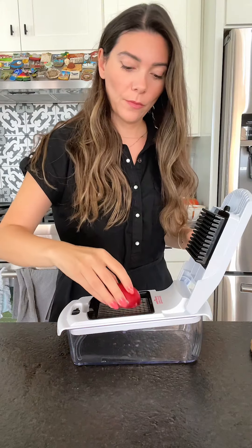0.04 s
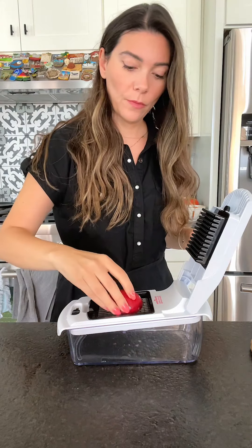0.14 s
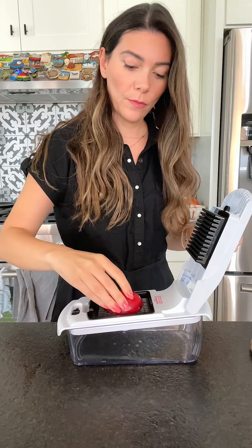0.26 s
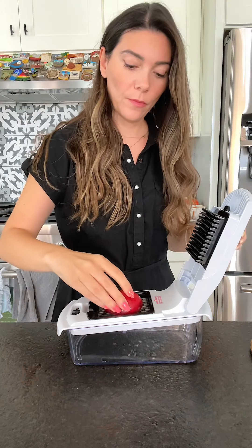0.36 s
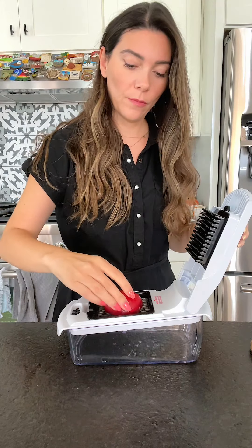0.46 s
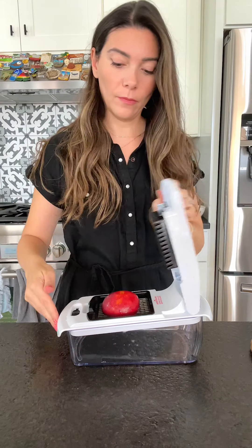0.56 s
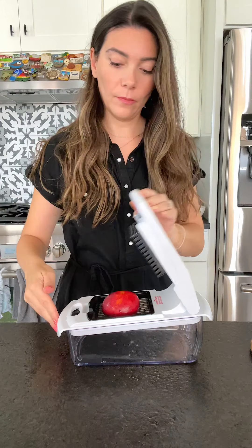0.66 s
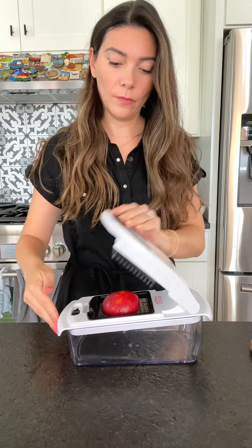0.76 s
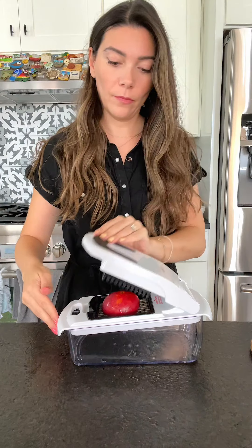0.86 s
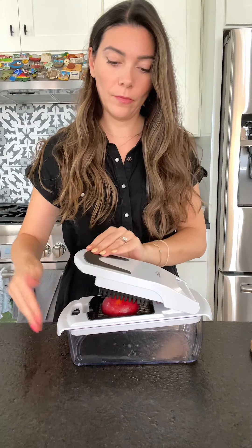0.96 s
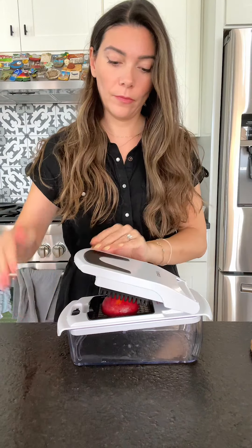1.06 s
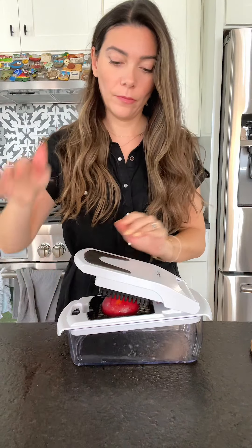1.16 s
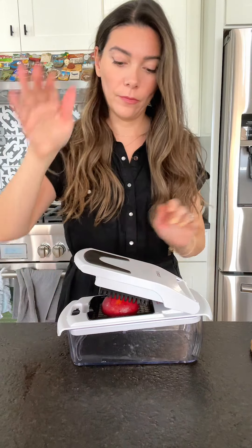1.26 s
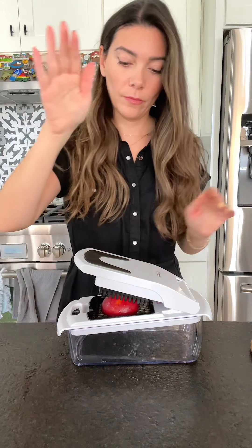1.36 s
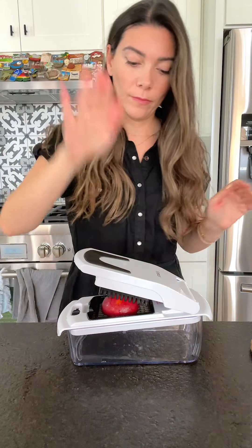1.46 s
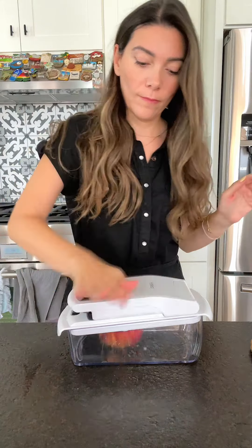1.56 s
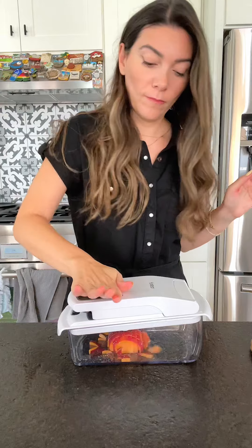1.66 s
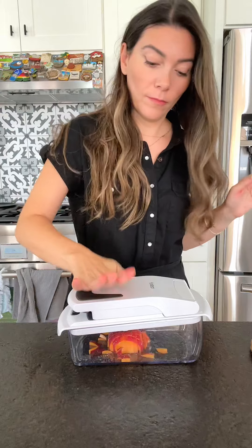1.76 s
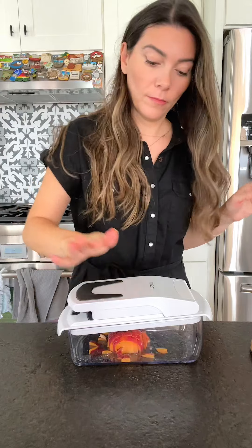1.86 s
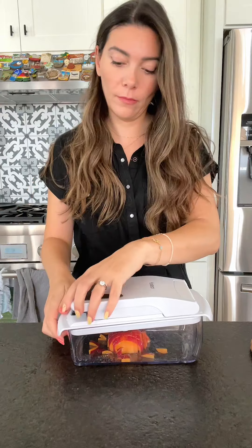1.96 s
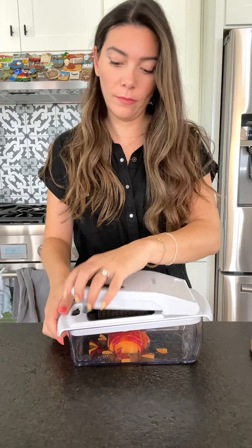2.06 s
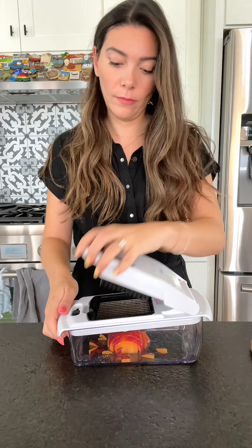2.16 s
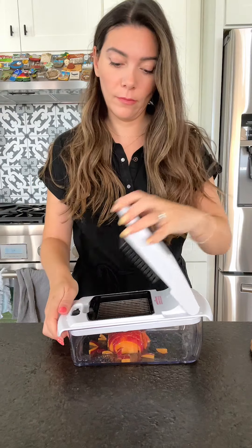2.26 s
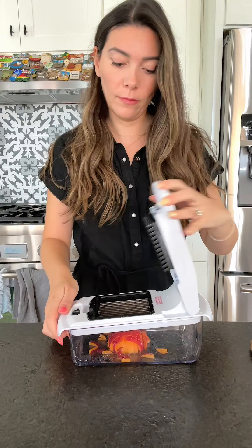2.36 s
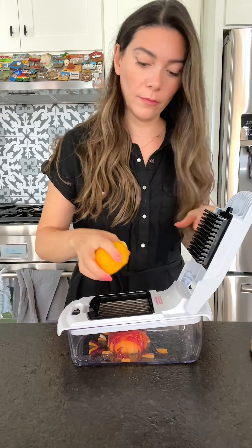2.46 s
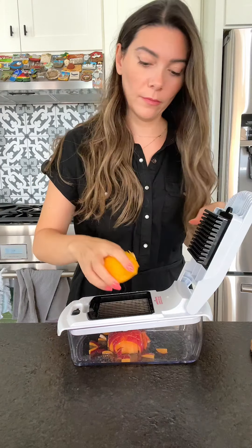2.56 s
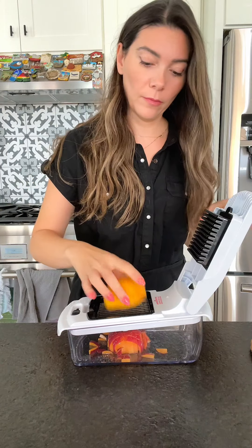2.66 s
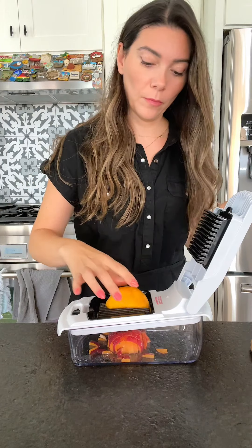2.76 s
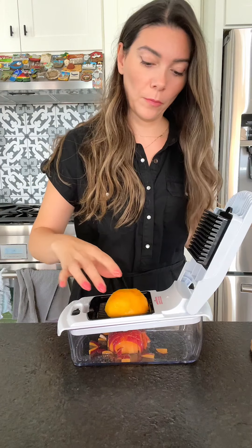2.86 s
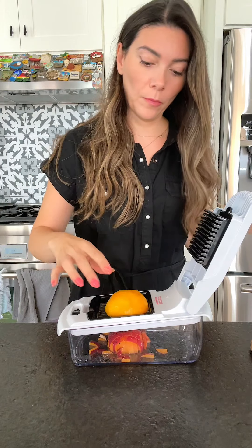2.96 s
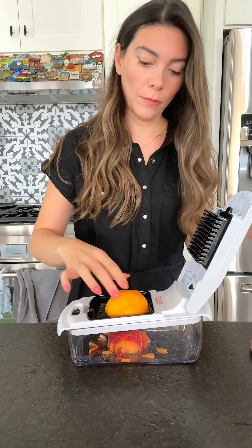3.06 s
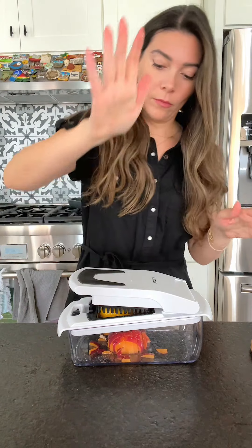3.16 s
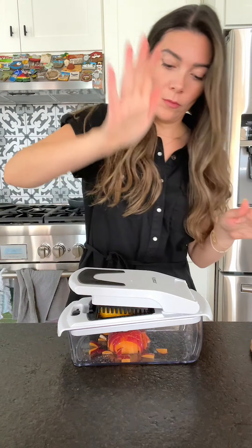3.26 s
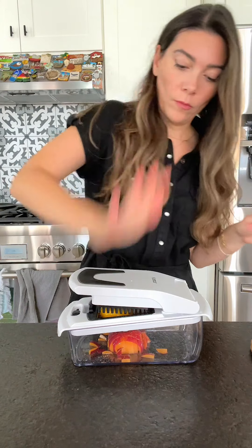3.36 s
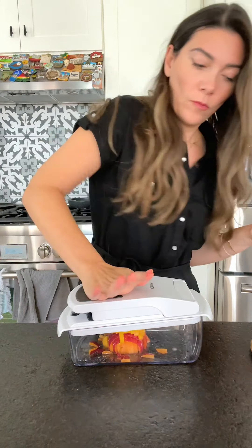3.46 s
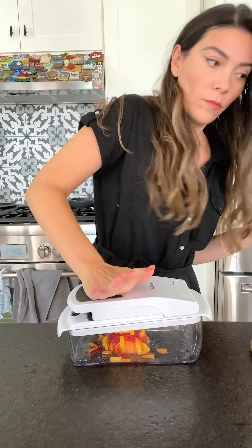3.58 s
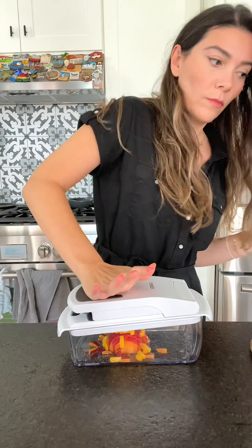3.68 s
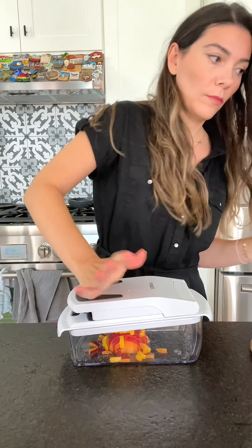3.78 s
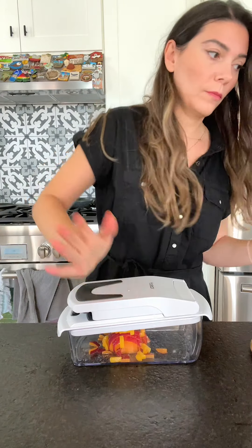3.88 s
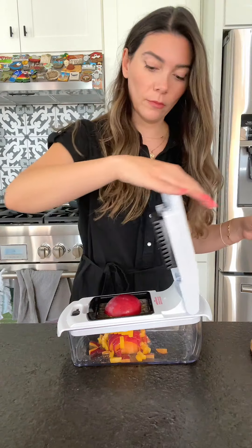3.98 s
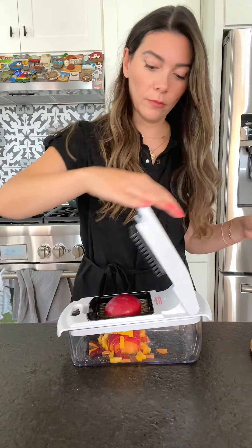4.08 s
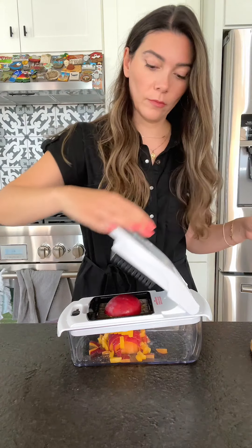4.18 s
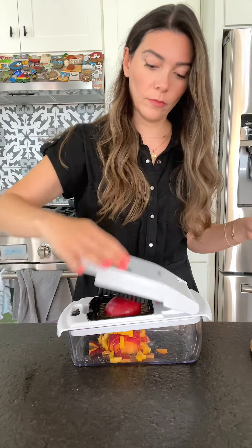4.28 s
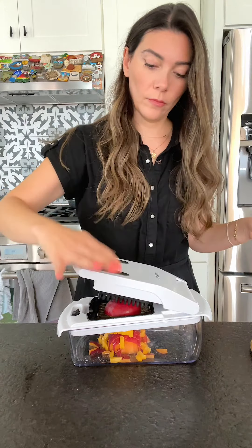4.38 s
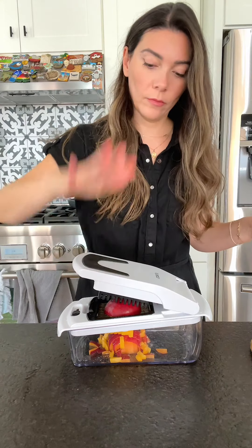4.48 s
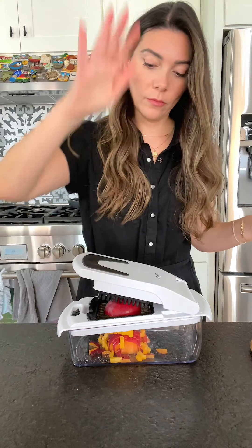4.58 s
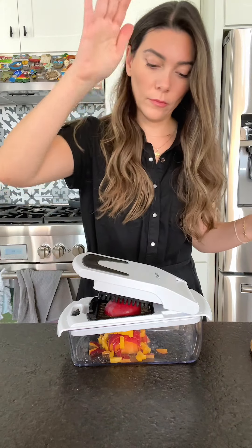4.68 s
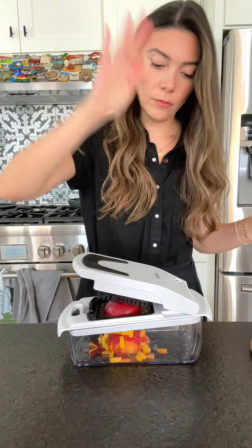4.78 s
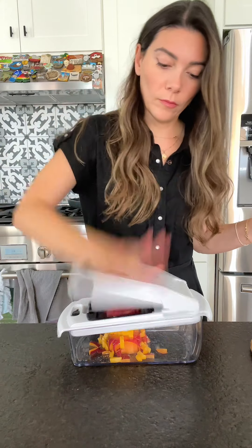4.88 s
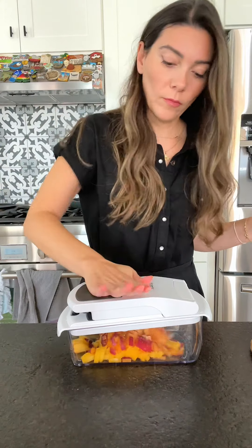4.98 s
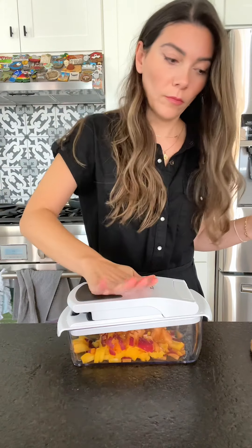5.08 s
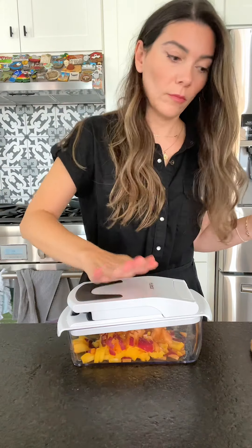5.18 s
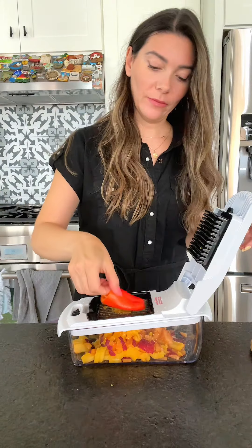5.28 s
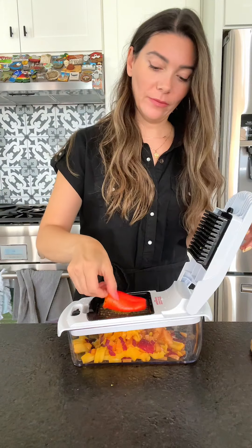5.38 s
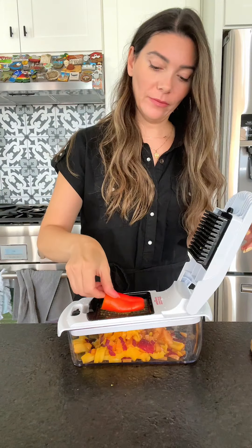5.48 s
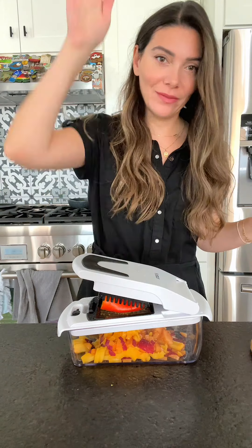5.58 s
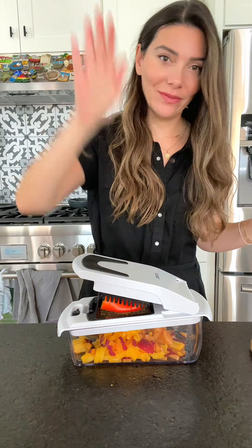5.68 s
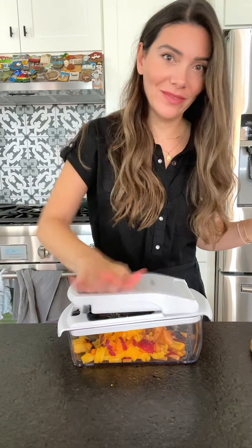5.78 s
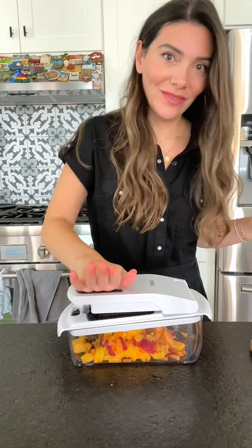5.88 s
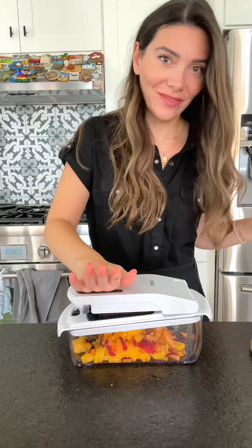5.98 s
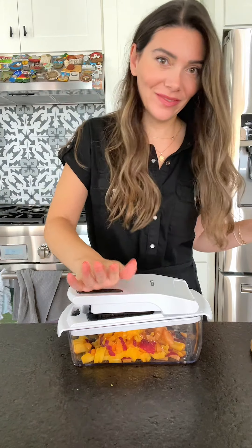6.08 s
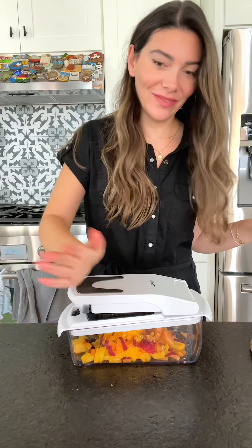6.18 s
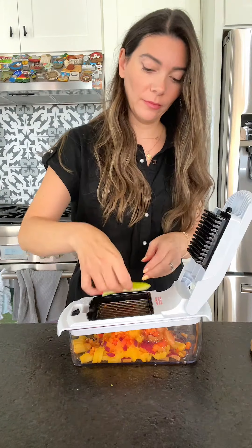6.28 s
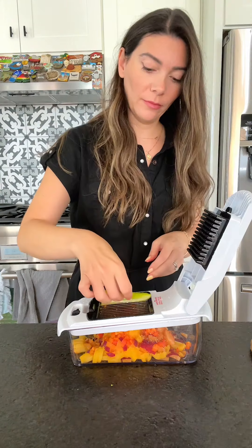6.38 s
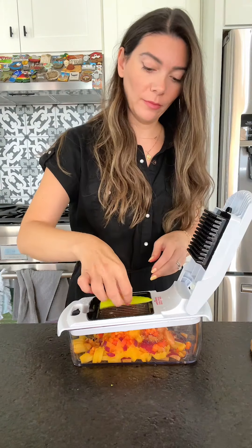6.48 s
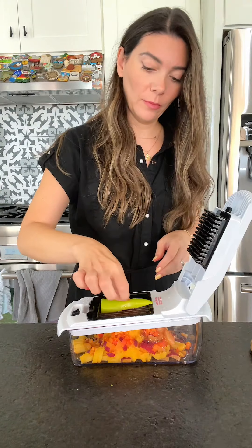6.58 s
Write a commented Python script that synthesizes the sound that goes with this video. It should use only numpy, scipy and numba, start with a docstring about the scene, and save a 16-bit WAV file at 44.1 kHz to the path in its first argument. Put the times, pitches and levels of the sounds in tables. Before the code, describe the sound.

Close stereo pickup of a manual fruit chopper on a hard counter. Soft handling and small plastic taps lead to an explosive lid slam, repeated three more times with lighter knocks between. Each slam is a fast crunching clatter, hollow and bright, with low thump, metallic shimmer and falling pieces. Echo swells up behind it, then is chopped off at edits, over low hum, faint hiss and changing rumble.

```python
"""In a hard kitchen, hands first rub and knock the plastic of a vegetable chopper, over hum, hiss and rumble.
Then, four times, a palm slams its hinged lid onto fruit: a quick run of blows rings lid and tub as damped modes.
Slams and some knocks also excite counter and blade grid; after slams the cut fruit patters into the tub.
A limiter ducks each slam, then holds its echo up while it recovers. Between slams, knocks and rubs return.
Where a new stretch begins, the echo stops short and the background levels step."""
import sys
import numpy as np
from scipy import signal
from scipy.fft import rfft, irfft, next_fast_len
from scipy.io import wavfile
from scipy.ndimage import uniform_filter1d
from numba import njit

SR = 44100
rng = np.random.default_rng(int(sys.argv[2]) if len(sys.argv) > 2 else 0)


def output_pcm(signal):
    """Save a mono or channel-first signal as 16-bit PCM at the path in sys.argv[1].

    Samples are clipped to [-1, 1] before scaling.
    """
    pcm = np.clip(np.atleast_2d(signal).T, -1, 1) * 32767
    wavfile.write(sys.argv[1], SR, np.round(pcm).astype(np.int16))


N = 292496

# stretches of steady background: (start t/s, hum level/dB, air hiss level/dB, low rumble level/dB)
STRETCHES = [(0, -61, -73.5, -66.5), (1.912, -60.5, -72, -89), (2.477, -62.5, -77, -72),
             (3.152, -61, -76.5, -78), (3.946, -61, -72.5, -50.5), (5.245, -64.5, -76, -69.5),
             (6.279, -59, -77, -96)]
# power spectra of the background, each scaled to rms 1: (f/Hz, relative density level/dB)
HUM_SPECTRUM = [(15, -39), (25, -18), (44, -1), (91, -9), (151, -6), (237, -8), (267, 1), (297, -14),
                (452, -1), (517, -13.5), (763, -8.5), (900, -25), (1170, -46.5), (1980, -120)]
HISS_SPECTRUM = [(530, -31.5), (900, -4), (944, -6), (1040, -4), (1350, -5), (2250, -10), (16000, -37)]
RUMBLE_SPECTRUM = [(15, -43), (25, -13), (44, -1.5), (91, -3), (117, -8.5), (150, 0), (185, -17), (238, -3),
                   (283, -7), (337, -7), (386, -18), (459, -12.5), (649, -17), (1770, -33), (2500, -44.5),
                   (3250, -72.5), (5500, -120)]
# wavering tones in the rumble: (mean f/Hz, level/dB relative to the rms of the rumble noise)
DRONE = [(58, -11.5), (88, -7.5), (150, -8.5), (240, -7.5), (335, -11.5)]

# fingers and fruit rubbing on the plastic: (start t/s, length t/s, level/dB, hiss level/dB relative to the ring)
RUBS = [(0.088, 0.044, -53, -20), (0.136, 0.031, -52, -12), (0.498, 0.26, -66.5, -11),
        (0.89, 0.027, -66, -22), (0.949, .02, -55.5, -22), (1.97, 0.052, -58, -24),
        (2.044, 0.09, -65.5, -0.5), (2.128, 0.032, -56.5, -13), (2.21, 0.098, -68, -22),
        (2.36, 0.056, -70, -36), (3.541, 0.12, -39.5, -34.5), (3.704, 0.047, -41.5, -32),
        (4.345, .035, -45, -16), (4.403, .1, -57, -7), (5.30, 0.08, -74, -8), (6.389, 0.068, -76.5, -14),
        (6.477, 0.047, -70, -5)]
RUB_ATTACK_S, RUB_RELEASE_T60_S = 0.012, 0.05
# lid, hinge and fingers knocking the plastic:
# (t/s, strength level/dB, contact half-width t/ms, crack level/dB relative to the ring)
KNOCKS = [(0.099, -40, 0.61, -13), (0.961, -35.5, 0.78, -20.5), (0.972, -33.5, 1.2, -37),
          (0.985, -46.5, 0.44, -28), (1.975, -42.5, 0.91, -15), (2.025, -53, 0.7, -27),
          (2.042, -31, 0.3, -25), (2.049, -37, 2.1, -24), (2.118, -42, 0.98, -21),
          (2.155, -37.5, 0.63, -20), (2.198, -34, 0.54, -26.5), (2.213, -42, 0.42, -23),
          (2.334, -24.5, 0.44, -41), (2.708, -5.5, 0.33, -8), (2.714, -13, 0.89, -30),
          (2.720, -7, 0.34, -24), (2.852, -18.5, 0.28, -12), (2.857, -19, 0.56, -28),
          (3.611, -17, 0.44, -32), (3.630, -44, .3, -23), (3.707, -25, 0.84, -26.5),
          (3.748, -33, 0.45, -30), (4.302, -21.5, 0.35, -17.5), (4.304, -16.5, 0.73, -26),
          (4.318, -27, 0.2, -19), (4.323, -23.5, 0.65, -17.5), (5.284, -42, .5, -11),
          (5.288, -27, 0.88, -27.5), (5.297, -35, 0.84, -12.5), (6.385, -44.5, 0.72, -17.5),
          (6.521, -42, 0.99, -25.5), (6.573, -49.5, 1.1, -31.5)]
KNOCK_ECHO_DB = 3  # extra echo level of the knocks, relative to that of the slams
KNOCK_HELD = 0.65  # factor on the free decay times while a hand rests on the plastic
# small bright ticks, nails or ring touching the frame: (t/s, strength level/dB)
TICKS = [(0.099, -62), (0.152, -66), (0.511, -70), (0.905, -74), (0.962, -60), (1.974, -70), (2.083, -61.5),
         (4.322, -27), (5.288, -48), (6.380, -63.5), (6.445, -66.5), (6.502, -66), (6.514, -73),
         (6.57, -71.5)]
# modes of a tick, before each lands at its own spot: (mean f/Hz, mean level/dB, t60/s)
TICK_MODES = [(2700, -9, .003), (3750, -4, .004), (4900, -1, .003), (6000, 0., .003), (7200, 0., .003),
              (8600, -3, .002), (10200, -7, .002)]

# palm, blades and lid landing:
# (t/s, strength level/dB, contact half-width t/ms, crack level/dB relative to the ring)
SLAMS = [(1.554, 10, 0.25, -4), (1.560, 13.5, 0.71, -20), (1.568, 8.5, 0.28, 3.5), (1.581, 23, 0.18, -9),
         (3.393, 5.5, 0.47, -9.5), (3.398, 6, 1.2, -14.5), (3.411, 13.5, 0.072, -13),
         (3.42, 7.5, 1.16, -18), (4.881, 8, 0.25, -4), (4.887, 17, 0.32, -11), (4.895, 17, 0.6, -21),
         (4.902, 21.5, 0.12, -5.5), (5.769, 2, 0.19, -2), (5.777, 11.5, 0.42, -15), (5.785, 12, 0.077, -11),
         (5.789, 8.5, 0.99, -19)]
# modes of lid and tub: (f/Hz, mean level/dB, free t60/s)
BODY = [(220, -21.5, 0.13), (260, -18.5, 0.11), (320.3, -6, 0.1), (390, 3.5, 0.04), (525, 3, 0.041),
        (644, -0.5, 0.028), (790.3, 3, .045), (935.4, -1.5, 0.048), (1094, -2.5, 0.032),
        (1118, -5.5, 0.057), (1297, 1, 0.032), (1404, 0.5, 0.017), (1360, -5.5, 0.01), (1677, -8, 0.04),
        (2340, -7.5, 0.02), (2310, -11, 0.041), (2390, -6.5, 0.0075), (2947, -19.5, 0.0043),
        (3240, -23.5, 0.0087), (3380, -15.5, 0.06), (4160, -17.5, 0.0037)]
# spectrum of the plastic's crack, also of its rubbing hiss: (f/Hz, relative level/dB)
CRACK_SPECTRUM = [(300, -20), (1200, 8.5), (2400, -1), (4500, -6), (7000, -12.5), (11000, -18.5),
                  (16000, -34.5)]
CRACK_T60_S = 0.026
SMALL_BODY_HZ = 119  # below this the small body radiates little

# kitchen echo: (f/Hz, relative level/dB, late t60/s, left-right correlation 0-1, added late level/dB)
KITCHEN = [(64.77, -4.5, 0.27, 1, -0.5), (125, -1.5, 0.59, 1, -5), (247, -7, 0.57, 0.9, 0),
           (514, -6.5, 0.63, 0.4, 1), (740, -3, .75, 0, 2.5), (1050, -2, 0.75, 0, -1),
           (1552.4, -2.5, .66, 0.19, 2.5), (2120, 4.5, .66, 0.2, 1.5), (2700, 5, 0.59, 0, 6),
           (3400, 1, .66, .2, 5.5), (4100, 2, 0.67, 0.1, 0), (6640, -3, 0.6, 1, 2.5),
           (9200, -0.5, .5, 0, 1.5), (14300, -3, .25, 0, -4.5)]
LATE_DB, EARLY_DB, EARLY_T60_S = -14.5, -3.5, 0.16
ECHO_PATHS = 3  # independent noise echoes that successive blows take in turn, for a diffuse tail

PIECES_DB, PIECES_T60_S = -35.5, 0.25  # level relative to the driving blow, and decay of the patter
# the counter thumped by slams and the falling lid: (t/s, strength level/dB)
THUMPS = [(1.56, -17), (2.71, -41), (3.40, -17), (4.89, -16), (5.775, -25.5)]
# modes of the counter: (f/Hz, level/dB, t60/s)
COUNTER = [(62.3, 0.5, 0.42), (124.3, -3.5, 0.51), (243, -4, 0.5)]
# the steel blade grid set ringing: (t/s, strength level/dB)
BLADE_TAPS = [(1.582, -19), (2.71, -41), (3.412, -15.5), (4.322, -50.5), (4.903, -17), (5.292, -53),
              (5.785, -17)]
# modes of the blades, before chatter blurs them: (f/Hz, level/dB, t60/s)
BLADES = [(2110, -2, 0.11), (2209, 0, 0.3), (2406, 0, 0.13), (2420, -8, 0.33), (2580, -11.5, 0.16)]

LIMIT_DB, ATTACK_S, RECOVER_DB_S = -6.5, 0.0091, 72  # threshold, attack time constant, recovery rate
KNEE = 12  # exponent of the soft saturation
LOW_CUT_HZ, TOP_HZ = 45, 16100


def undb(db):
    """Level definition: amplitude ratio from decibels."""
    return 10 ** (np.asarray(db) / 20)


def fade(t, t60):
    """Exponential decay, falling 60 dB in t60."""
    return np.exp(-np.log(1000) * t / t60)


def along(hz, table, column=1):
    """Linear interpolation of a table column on a log-frequency axis."""
    table = np.array(table)
    return np.interp(np.log(np.maximum(hz, 1)), np.log(table[:, 0]), table[:, column])


def edges():
    """Division of time: sample indices at which stretches begin, and the end."""
    return [int(row[0] * SR) for row in STRETCHES] + [N]


def high_pass(sound, hz):
    """Second-order high-pass filtering."""
    return signal.sosfilt(signal.butter(2, hz, "high", fs=SR, output="sos"), sound)


def coloured(table, size):
    """Spectral shaping: stereo noise of rms 1, its left-right correlation that of the kitchen."""
    fast = next_fast_len(size)
    hz = np.fft.rfftfreq(fast, 1 / SR)
    alike = np.clip(along(hz, KITCHEN, column=3), 0, 1)
    white = rfft(rng.standard_normal((2, fast)))
    mid, side = white * undb(along(hz, table)) * np.sqrt([1 + alike, 1 - alike])
    pair = irfft(np.array([mid + side, mid - side]), fast)[:, :size]
    return pair / np.sqrt(np.mean(pair ** 2))


def rumbling(waver=0.039):
    """Frequency modulation: broad low noise holds a few tones whose pitch wanders slowly."""
    wander = rng.standard_normal((len(DRONE), N))
    drift = uniform_filter1d(wander, size=SR // 8, axis=1) * np.sqrt(SR / 8)
    hz, db = np.transpose(DRONE)[:, :, None]
    phase = 2 * np.pi * np.cumsum(hz * (1 + waver * drift), axis=1) / SR
    tones = undb(db) * np.sqrt(2) * np.sin(phase)
    return coloured(RUMBLE_SPECTRUM, size=N) + tones.sum(axis=0)


def ring(shares_db, signs, held, rise_cycles=0.41):
    """Modal superposition: a sharp tap excites modes weighted by its place; low modes build up later."""
    hz, db, t60 = np.transpose(BODY)[:, :, None]
    t = np.arange(4096) / SR
    rise = 1 - np.exp(-t * hz / rise_cycles)
    swing = fade(t, held * t60) * rise * np.sin(2 * np.pi * hz * t)
    return np.sum(signs[:, None] * undb(db + shares_db[:, None]) * swing, axis=0)


def contact_push(contact_ms):
    """Contact force: a raised-cosine pulse whose width at half height is about the contact time."""
    return np.hanning(max(int(2 * contact_ms * SR / 1000), 1) + 2)


def slipping(slips_hz, scatter_db, contact_ms, held, spot_db=4.0, count=6):
    """Stick-slip: random soft taps at changing spots give a damped ring, and a hiss in the same bursts."""
    happens = rng.random(N) < slips_hz / SR  # slips_hz is the mean rate
    strength = undb(scatter_db * np.minimum(rng.exponential(size=N), 2)) * rng.standard_normal(N)
    slips = happens * strength
    spot = np.repeat(rng.integers(0, count, N // 512 + 1), 512)[:N]
    push, body = contact_push(contact_ms), 0
    for k, (share, sign) in enumerate(rng.standard_normal((count, 2, len(BODY)))):
        tap = np.convolve(ring(spot_db * share, np.sign(sign), held), push)
        body = body + signal.oaconvolve(slips * (spot == k), tap)[:N]
    hiss = coloured(CRACK_SPECTRUM, size=N) * uniform_filter1d(np.abs(slips), size=600)
    return body / body.std(), hiss / hiss.std()


def rubbing():
    """Friction: skin and fruit drag on plastic the hand damps; each rub swells, holds and dies away."""
    body, hiss = slipping(slips_hz=1490.0, scatter_db=0.0, contact_ms=0.076, held=0.68)
    t, out = np.arange(N) / SR, 0
    for s, length, db, hiss_db in RUBS:
        swell = np.clip((t - s) / RUB_ATTACK_S, 0, 1)
        level = swell * fade(np.maximum(t - s - length, 0), RUB_RELEASE_T60_S)
        out = out + undb(db) * level * (body + undb(hiss_db) * hiss)
    return out


def side_db(low_db=-19, high_db=-5):
    """Directivity: the left-right difference is small for low modes, larger for high ones."""
    return along(np.array(BODY)[:, 0], [(400, low_db), (2000, high_db)])


def all_round(sound, octaves=0.32):
    """Radiated power: walls get every face at once, a short pulse with the sound's smoothed spectrum."""
    total = np.cumsum(np.abs(rfft(sound)) ** 2)
    bins = np.arange(len(total))
    low = bins * 2 ** -octaves - 1
    high = np.minimum(bins * 2 ** octaves + 1, bins[-1])
    power = (np.interp(high, bins, total) - np.interp(low, bins, total)) / (high - low)
    return np.roll(irfft(np.sqrt(power)), 256)[:512] * np.hanning(512)


def blows(table, echo_db=0., held=0.81, spot_db=2.5, spread_s=0.002):
    """Impact excitation: each contact pulse rings the body and cracks.

    Rows: left, right, then what each echo path receives."""
    out, t = np.zeros((2 + ECHO_PATHS, N + 8192)), np.arange(4096) / SR
    for k, (s, db, contact_ms, crack_db) in enumerate(table):
        spot = rng.standard_normal((3, len(BODY)))
        push, shares_db = contact_push(contact_ms), spot_db * spot[0]
        mid = signal.fftconvolve(ring(shares_db, np.sign(spot[1]), held), push)[:4096]
        side = signal.fftconvolve(ring(shares_db + side_db(), np.sign(spot[2]), held), push)[:4096]
        body = (mid + side * np.array([[1], [-1]])) / np.abs(mid).max()
        crack = coloured(CRACK_SPECTRUM, size=4096)
        crack = crack + 0.84 * crack.mean(axis=0)  # more alike left and right
        crack = crack * fade(t, CRACK_T60_S) * (1 - np.exp(-t / spread_s))
        at, sound = int(s * SR), undb(db) * (body + undb(crack_db) * crack)
        out[:2, at:at + 4096] += sound
        out[2 + k % ECHO_PATHS, at:at + 512] += undb(echo_db) * all_round(sound[0])
    return out[:, :N]


def ticking(spot_db=3.0, detune=0.06, scrape_s=0.006):
    """Noise-excited modes: each tick is a tiny scrape into short high modes, varied by where it lands."""
    out, t = np.zeros(N + 2048), np.arange(1024) / SR
    hz, db, t60 = np.transpose(TICK_MODES)[:, :, None]
    for s, strength_db in TICKS:
        spot = rng.standard_normal((2, len(TICK_MODES), 1))
        scrape = rng.standard_normal(1024) * fade(t, scrape_s)
        scrape = scrape / np.sqrt(np.sum(scrape ** 2))
        amplitude = undb(strength_db + db + spot_db * spot[0])
        swing = amplitude * fade(t, t60) * np.sin(2 * np.pi * hz * (1 + detune * spot[1]) * t)
        at = int(s * SR)
        out[at:at + 2047] += np.convolve(swing.sum(axis=0), scrape)
    return out[:N]


def kitchen():
    """Reverberation: near cupboards' echo dies fast, the whole room's slowly and by frequency band."""
    size, table = SR, np.array(KITCHEN)
    t = np.arange(size) / SR
    octave = np.log2(np.maximum(np.fft.rfftfreq(size, 1 / SR), 1))
    centres = np.log2(table[:, 0])
    noise, echo = rfft(coloured(table[:, :2], size=size)), 0
    for k, (_, _, late_t60, _, late_colour_db) in enumerate(KITCHEN):
        band = irfft(noise * np.interp(octave, centres, np.arange(len(KITCHEN)) == k), size)
        late = undb(LATE_DB + late_colour_db) * fade(t, late_t60)
        early = undb(EARLY_DB) * fade(t, EARLY_T60_S)
        echo = echo + band * (late + early)
    onset = np.clip(t / 0.00093, 0, 1)
    return echo * onset / np.sqrt(0.038 * SR)


def pieces(hiss_db=-10, light_hz=800):
    """Many small impacts: cut fruit patters ever softer into the tub, too light to stir the low modes."""
    body, hiss = slipping(slips_hz=396.0, scatter_db=5.0, contact_ms=0.09, held=0.48)
    body = high_pass(body, light_hz)
    level, starts = np.zeros(N), np.array(edges())
    for s, db, *_ in SLAMS:
        a = int(s * SR)
        b = starts[starts > a][0]  # the patter stops with its stretch
        level[a:b] += undb(db + PIECES_DB) * fade(np.arange(b - a) / SR, PIECES_T60_S)
    return level * (body + undb(hiss_db) * hiss)


def taps(table):
    """Impulsive excitation: one impulse per blow."""
    out = np.zeros(N)
    for s, db in table:
        out[int(s * SR)] = undb(db)
    return out


def modes(table):
    """Impulse response: a sum of decaying sinusoids."""
    t = np.arange(SR) / SR
    return sum(undb(db) * fade(t, t60) * np.sin(2 * np.pi * hz * t) for hz, db, t60 in table)


def blade_grid(chatter_s=0.12):
    """Repeated contact: blades chatter in their frame after a tap, which blurs their modal ring."""
    t = np.arange(SR // 4) / SR
    chatter = rng.standard_normal(SR // 4) * fade(t, chatter_s)
    return signal.fftconvolve(modes(BLADES), chatter / np.sqrt(np.sum(chatter ** 2)))


def scene():
    """Superposition: background, direct sound, its echo and the struck counter and blades add up."""
    hum, hiss = coloured(HUM_SPECTRUM, size=N), coloured(HISS_SPECTRUM, size=N)
    rumble = rumbling()
    soft = rubbing() + ticking() + pieces()
    dry = blows(KNOCKS, KNOCK_ECHO_DB, KNOCK_HELD) + blows(SLAMS)
    dry[:2] += soft
    dry[2] += soft.mean(axis=0)  # soft sounds take the first echo path
    dry = high_pass(dry, SMALL_BODY_HZ)
    echoes = [kitchen() for _ in range(ECHO_PATHS)]
    struck = [(taps(THUMPS), modes(COUNTER)), (taps(BLADE_TAPS), blade_grid())]
    out = np.zeros((2, N))
    for a, b, (_, hum_db, hiss_db, rumble_db) in zip(edges(), edges()[1:], STRETCHES):
        # echo and rings of earlier stretches do not carry over
        wet = sum(signal.fftconvolve(send[None, a:b], echo, axes=1)[:, :b - a]
                  for send, echo in zip(dry[2:], echoes))
        rings = sum(signal.fftconvolve(hits[a:b], answer)[:b - a] for hits, answer in struck)
        floor = undb(hum_db) * hum[:, a:b] + undb(hiss_db) * hiss[:, a:b]
        floor = floor + undb(rumble_db) * rumble[:, a:b]
        out[:, a:b] = dry[:2, a:b] + wet + rings + floor
    return out


@njit
def limiter(peak, top, attack, recover):
    """Gain control: ducks quickly under the peak and climbs back at a steady dB rate."""
    gain, held = np.empty(len(peak)), top
    for i in range(len(peak)):
        if peak[i] > held:
            held = held + attack * (peak[i] - held)
        else:
            held = max(held * recover, top)
        gain[i] = top / held
    return gain


def record(dry):
    """Compression and saturation: the limiter reacts late, so first swings round off; then band-limiting."""
    peak, out = np.abs(dry).max(axis=0), np.empty_like(dry)
    attack, recover = 1 / (ATTACK_S * SR), float(undb(-RECOVER_DB_S / SR))
    for a, b in zip(edges(), edges()[1:]):
        # the limiter starts afresh in each stretch
        loud = dry[:, a:b] * limiter(peak[a:b], float(undb(LIMIT_DB)), attack, recover)
        out[:, a:b] = loud / (1 + np.abs(loud) ** KNEE) ** (1 / KNEE)
    out = high_pass(out, LOW_CUT_HZ)
    top_cut = signal.ellip(8, 0.2, 70, TOP_HZ, fs=SR, output="sos")
    return np.clip(signal.sosfilt(top_cut, out), -1, 1)


dry = scene()
out = record(dry)
output_pcm(out)
```